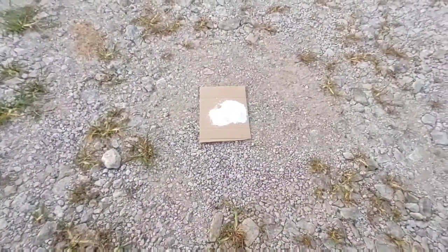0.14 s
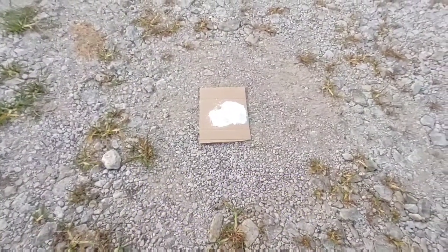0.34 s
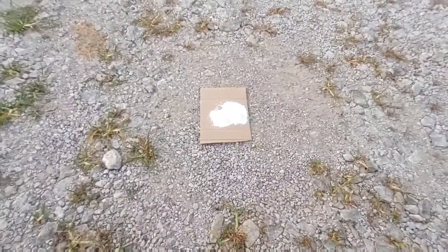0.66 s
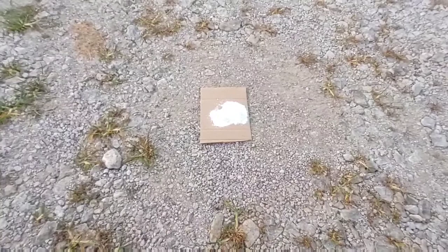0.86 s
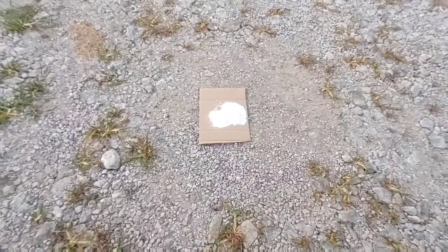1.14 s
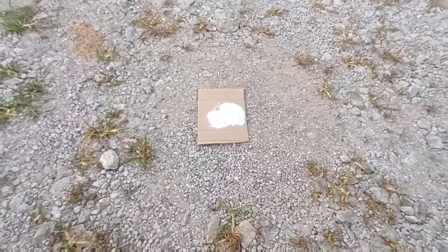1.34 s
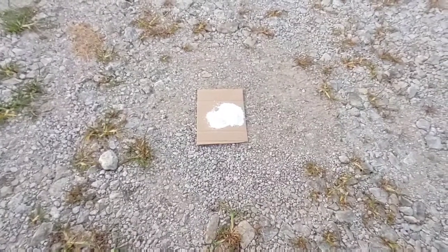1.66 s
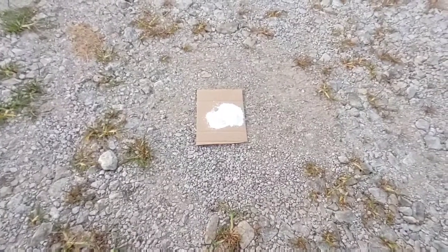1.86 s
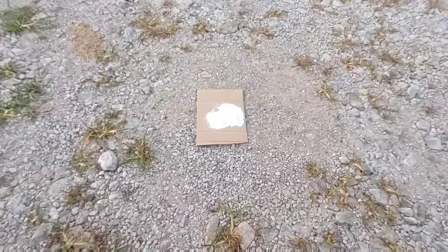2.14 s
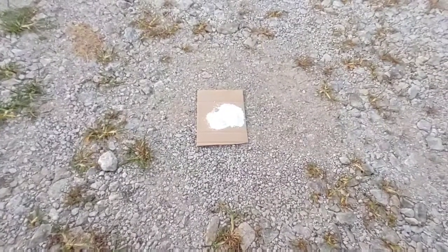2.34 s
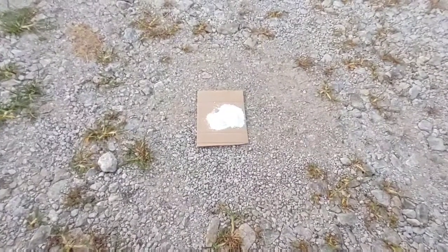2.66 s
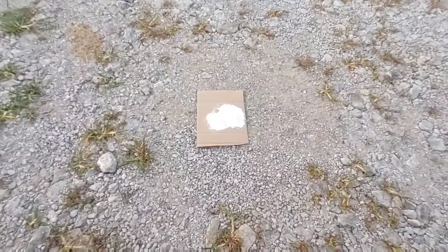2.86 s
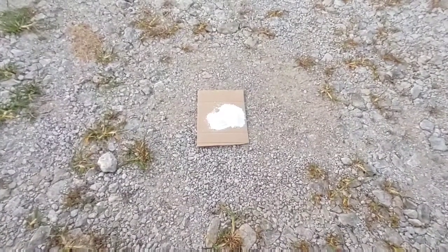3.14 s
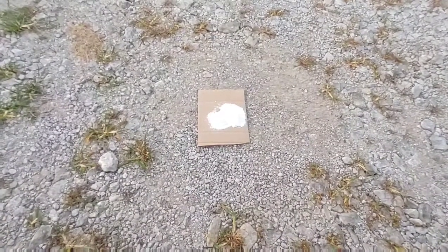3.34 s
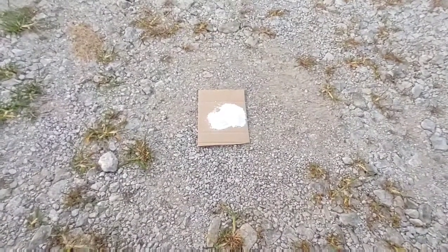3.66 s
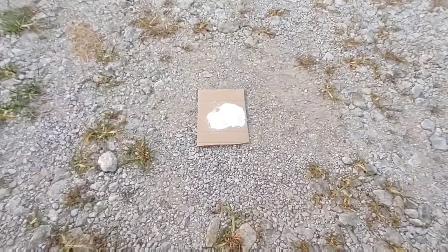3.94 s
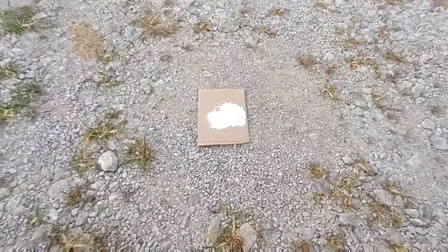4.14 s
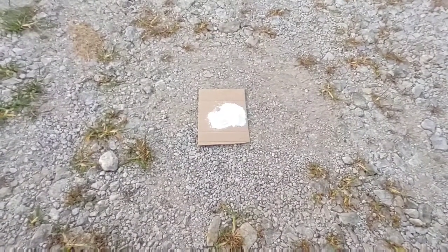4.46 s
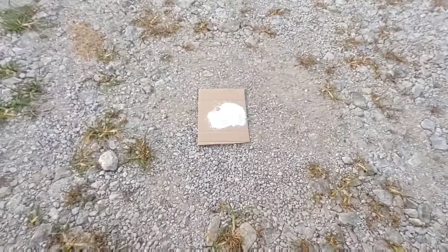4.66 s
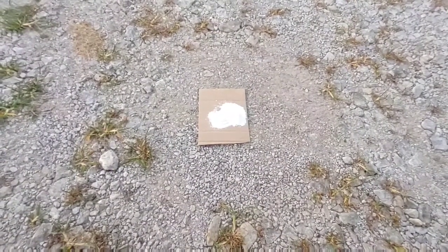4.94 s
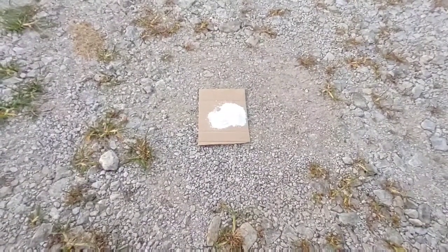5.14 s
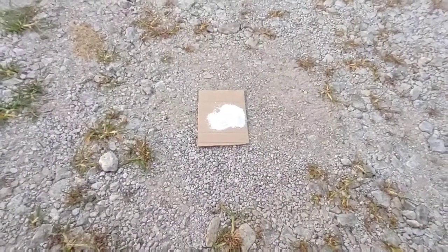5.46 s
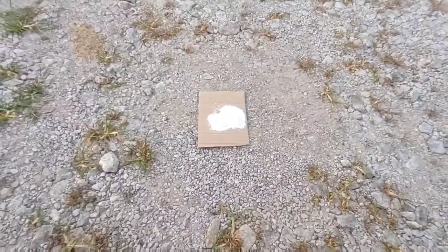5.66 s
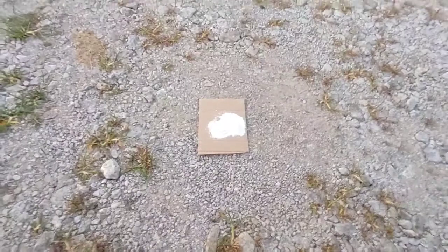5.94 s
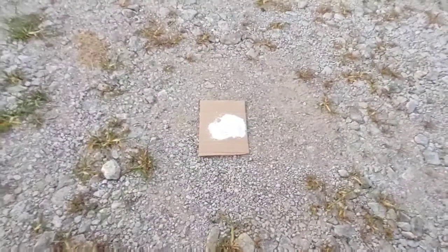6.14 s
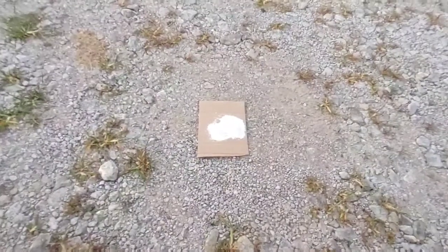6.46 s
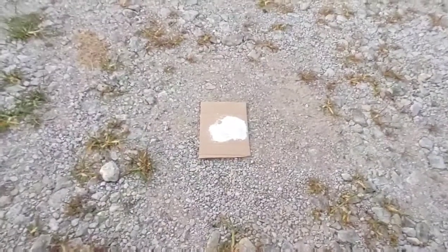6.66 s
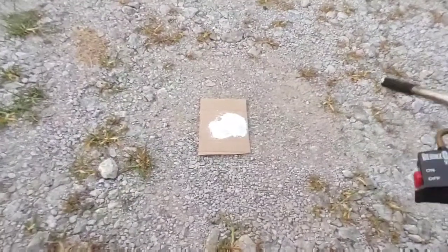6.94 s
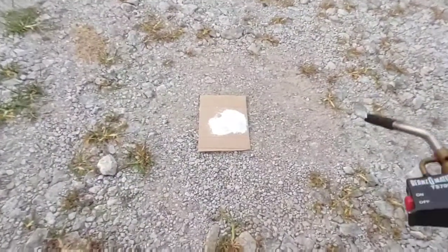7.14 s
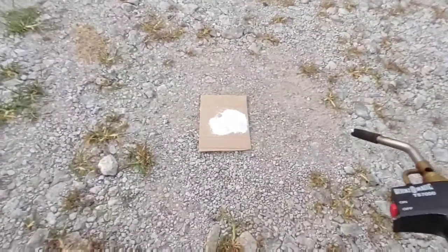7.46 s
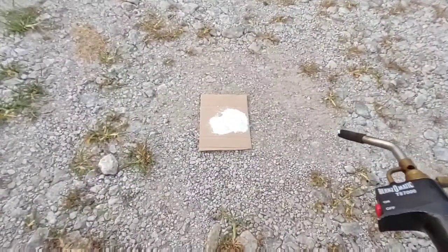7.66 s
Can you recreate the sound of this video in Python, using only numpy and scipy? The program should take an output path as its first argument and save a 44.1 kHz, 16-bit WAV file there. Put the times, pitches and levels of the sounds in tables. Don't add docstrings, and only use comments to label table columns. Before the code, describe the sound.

A handheld gas torch roars and hisses steadily outdoors, its hollow tone sweeping as it moves, with a quick swing away and back near the end.

```python
import sys
import numpy as np
from scipy import signal
from scipy.fft import rfft, irfft, next_fast_len
from scipy.io import wavfile
from scipy.ndimage import map_coordinates

SR = 44100
rng = np.random.default_rng(int(sys.argv[2]) if len(sys.argv) > 2 else 0)


def transcribe(u):
    v = np.clip(np.atleast_2d(u).T, -1, 1)
    q = np.round(v * 32767).astype(np.int16)
    wavfile.write(sys.argv[1], SR, q)


def gain_from_db(level_db):
    decades = np.asarray(level_db, float) / 20
    return 10 ** decades


N = 343539

# t/s, left bounce delay/ms, right bounce delay/ms, left port lag/ms, facing level/dB
TORCH_PATH = [(0, 1.38, 1.67, 0.36, -1), (.4, 1.13, 1.44, 0.26, 0.5), (.55, 0.93, 0.95, 0.18, -1),
              (.8, 0.52, 0.67, 0.16, 0.7), (1.15, 0.48, 0.4, 0.13, 0), (1.38, 0.4, 0.38, 0.116, -0.2),
              (2.1, 0.33, .38, 0.092, -0.5), (2.749, 0.32, 0.32, 0.085, -1), (3.05, 0.3, 0.33, 0.061, -0.5),
              (3.4, 0.15, 0.19, 0.053, -1.4), (5.0, 0.2, 0.2, 0.06, 0.1), (5.401, 0.14, 0.1, 0.022, 0),
              (6.18, 0.15, 0.12, 0.051, -0.3), (6.4, 1.07, 1.13, .12, -0.4),
              (6.718, 2.23, 2.36, 0.29, -2.8), (6.93, 1.2, 1.44, 0.2, -1), (7.17, 1.12, 1.28, 0.074, -0.4),
              (7.3, 0.39, 0.35, 0.063, 1), (7.44, 0.47, 0.46, 0.074, -1), (7.58, 0.13, 0.18, 0.067, -2.6)]
# f/Hz, level/dB per Hz
LEFT_JET_COLOUR = [(4400, -12), (5000, -3), (5400, -7.5), (6100, -8.5), (6800, -13), (7100, -17.5),
                   (7600, -21), (8300, -25), (9400, -24.5), (10700, -21), (11700, -20.5), (12700, -25),
                   (13300, -27)]
RIGHT_JET_COLOUR = [(4400, -13), (5000, -4), (5400, -1), (5800, -5), (6200, -5.5), (6550, -10),
                    (7050, -6.5), (7500, -10), (8000, -14.5), (8700, -10.5), (9200, -17), (9700, -23),
                    (11700, -23), (13300, -27)]
# f/Hz, level/dB per Hz
FLAME_COLOUR = [(25, -43), (50, -39), (100, -32), (140, -19.5), (200, -8), (300, -4.5), (500, -2),
                (750, -0.1), (1050, 0), (1500, -3.5), (2100, -8), (2900, -9.5), (3800, -11)]
# f/Hz, level/dB
FLAME_BALANCE = [(300, -2.5), (700, 1.5), (1200, 3), (1800, 7.5), (2500, -5), (3800, 0)]
# f/Hz, share/0-1
COHERENCE = [(25, .02), (60, .62), (110, .97), (200, .998), (600, .99), (1200, .98), (2200, .95),
             (4300, .9), (5200, .3), (7000, .1), (12000, .2)]
# f/Hz, steepness/1
LAYER_EDGES = [(300, 8), (4300, 8), (6500, 8), (8000, 24), (9400, 24), (12400, 48)]
# level/dB, share of facing/1, level per lag/dB per ms,
# left-right level/dB, left-right level per lag/dB per ms
LAYER_LEVELS = [(-37, 0.11, -6.5, -0.5, 4), (-26.5, 1, 2, 2, -11.5), (-37, 0.074, 9, 1, -18),
                (-42.5, 0.074, 4, 1.5, -42.5), (-48, 0.074, 22, 1.5, -41), (-47.5, .08, 11.5, 2, -23),
                (-47.5, .08, -10, 3.5, -85)]
# t/s, level/dB, half length/s
FLAME_FLARES = [
    (2.8, 1.6, 0.16),
    (7.22, 4.5, 0.024),
    (7.29, -4, 0.019),
    (7.34, 0.5, 0.032),
    (7.76, 3.5, 0.23),
]
# t/s, level/dB, half length/s
JET_SPITS = [
    (1.06, 1, 0.096),
    (5.32, 2, 0.076),
    (5.7, -1.5, 0.14),
    (6.07, 3, 0.041),
    (6.64, -6.5, 0.17),
    (7.24, 4.5, 0.13),
]
# t/s, level/dB
EDGE_TONE = [(0, 4.5), (.9, 6), (1.5, 3.5), (2.8, 1.5), (3.3, 0.5), (4.5, 0.5), (5.0, 4), (5.3, 2),
             (5.45, 1), (6.2, 1.5), (6.36, 3), (6.52, 6), (6.9, -2), (7.05, 5.5), (7.25, -1), (7.36, -1),
             (7.79, 3)]
# gain with torch low/0-1, gain per delay/ms^-1, loss per delay squared/ms^-2
GROUND_GAIN = [(0.578, 0.28, 0.11), (0.621, 0.56, 0.3)]
# f/Hz, width/Hz, share lost/0-1
CASING_SHADE = [(1360, 1000, 0.04), (1400, 1400, 0.42)]
# level/dB, level per bounce delay/dB per ms, low f/Hz, high f/Hz
GRAVEL_SCATTER = (-11, 5, 1108, 5183)
# low f/Hz, high f/Hz
BODY_BAND = [800, 3500]
# port/0-1, delay at ground/ms, delay per bounce delay/ms per ms, strength/0-1
ARM_REFLECTIONS = [(0, 0.72, 0.98, 0.1), (0, 2.15, 0.2, 0.1), (1, 1, 1, 0.2), (1, 1.3, 1.6, 0)]
# delay/ms, strength/0-1
CHEST_ECHO = [(2.92, 0.36), (2.95, 0.13)]
# low f/Hz, high f/Hz
CHEST_BAND = [483, 2030]
LEG_ECHO = (0.61, 0.1)
# t/s, left f/Hz, left f/Hz, left f/Hz, right f/Hz
HOLLOW_PATHS = [(.8, 966, 1295, 1860, 1010), (1.3, 1095, 1400, 1900, 1200), (2.2, 1140, 1480, 1907, 1340),
                (2.8, 1153, 1506, 1950, 1630), (3.25, 1134, 1570, 2240, 2150),
                (5.0, 1100, 1560, 2246, 2110), (6.2, 1104, 1577, 2200, 2062),
                (7.79, 1130, 1600, 2200, 2290)]
# port/0-1, width/Hz, share lost/0-1
HOLLOW_WIDTHS = [(0, 130, 0.5), (0, 130, .6), (0, 160, 0.5), (1, 283, .6)]

FLAME_LENGTH = 0.07
JET_BOUNCE = 0.016
GRAVEL_CUT_HZ, SCATTER_T60_S = 19845, 0.14
ARM_GONE_MS = 1


def in_time(rows):
    times, *columns = np.transpose(rows)
    return [np.interp(np.arange(N) / SR, times, column) for column in columns]


def at_hz(points, hz):
    table_hz, values = np.transpose(points)
    return np.interp(np.log(hz), np.log(table_hz), values)


def drift(rate_hz):
    pole = np.exp(-80 * np.pi * rate_hz / SR)
    noise = rng.standard_normal(N // 40 + 2002)
    slow = signal.lfilter([1], [1, -2 * pole, pole * pole], noise)[2000:]
    return np.interp(np.arange(N) / 40, np.arange(len(slow)), slow / slow.std())


def bumps(rows):
    t = np.arange(N) / SR
    return sum(db * np.exp(-((t - centre_s) / half_s) ** 2) for centre_s, db, half_s in rows)


def late(x, ms):
    return map_coordinates(x, [np.arange(N) - ms * SR / 1000], order=2, mode="mirror")


def band(x, edges_hz):
    return signal.sosfilt(signal.butter(1, edges_hz, "band", fs=SR, output="sos"), x)


def sides(shift_db):
    return gain_from_db(np.array([shift_db, -shift_db]) / 2)


def gravel_scatter(flame, bounce_ms):
    db, db_per_ms, *edges_hz = GRAVEL_SCATTER
    tail_s = np.arange(SR // 5) / SR
    tail = rng.standard_normal(SR // 5) * gain_from_db(-60 * tail_s / SCATTER_T60_S)
    tail = tail / np.linalg.norm(tail)
    return gain_from_db(db + db_per_ms * bounce_ms) * signal.fftconvolve(band(flame, edges_hz), tail)[:N]


def chest_echo(heard, port, lowered):
    ms, share = CHEST_ECHO[port]
    return share * (0.092 + 0.54 * lowered) * late(band(heard, CHEST_BAND), ms)


def leg_echo(flame, bounce_ms, lowered):
    delay_share, strength = LEG_ECHO
    return (1 - lowered) * strength * late(band(flame, CHEST_BAND), delay_share * bounce_ms)


def arm_echo(heard, port, bounce_ms, lowered):
    soft = band(heard, BODY_BAND)
    echoes = [share * late(soft, base_ms + slope * bounce_ms)
              for at, base_ms, slope, share in ARM_REFLECTIONS if at == port]
    return lowered * sum(echoes)


def moving_band(x, centre_hz, width_hz):
    out, state = np.zeros(N), np.zeros(2)
    pole = np.exp(-np.pi * width_hz / SR)
    b = (1 - pole * pole) / 2 * np.array([1, 0, -1])
    for i in range(0, N, 512):
        a = [1, -2 * pole * np.cos(2 * np.pi * centre_hz[i] / SR), pole * pole]
        out[i:i + 512], state = signal.lfilter(b, a, x[i:i + 512], zi=state)
    return out


def hollowed(x, port, lowered):
    for hz, (at, width_hz, share) in zip(in_time(HOLLOW_PATHS), HOLLOW_WIDTHS):
        if at == port:
            x = x - share * lowered * moving_band(x, hz, width_hz)
    return x


def casing_shade(x, centre_hz, width_hz, share):
    return x - share * signal.lfilter(*signal.iirpeak(centre_hz, centre_hz / width_hz, fs=SR), x)


def ground_bounce(flame, jet, port, ms):
    low_gain, rise, loss = GROUND_GAIN[port]
    gain = np.clip(low_gain + rise * ms - loss * ms ** 2, 0, 0.95)
    rough = signal.butter(1, GRAVEL_CUT_HZ, fs=SR, output="sos")
    downward = casing_shade(signal.sosfilt(rough, flame + JET_BOUNCE * jet), *CASING_SHADE[port])
    spread = FLAME_LENGTH * (0.6 + 0.6 * ms)
    return gain * sum(late(downward, ms * (1 + spread * part)) for part in (-1, 0, 1)) / 3


def position():
    rows = [(s, np.log(a), np.log(b), np.log(c), db) for s, a, b, c, db in TORCH_PATH]
    left, right, lag, facing_db = in_time(rows)
    return np.exp(left), np.exp(right), np.exp(lag), facing_db


def port_db(jet_colour, side, hz):
    low = [(f, db + side * at_hz(FLAME_BALANCE, f) * (f > 400) / 2) for f, db in FLAME_COLOUR]
    return at_hz(low + jet_colour, hz)


def turbulence():
    size = next_fast_len(N)
    hz = np.maximum(np.arange(size // 2 + 1) * SR / size, 1)
    shared, left, right = rfft(rng.standard_normal((3, size)))
    alike = np.clip(at_hz(COHERENCE, hz), 0, 1)
    ports = np.sqrt(alike) * shared + np.sqrt(1 - alike) * np.array([left, right])
    ports = ports * gain_from_db([port_db(LEFT_JET_COLOUR, 1, hz), port_db(RIGHT_JET_COLOUR, -1, hz)])
    slopes = [1 / (1 + (hz / edge) ** steep) for edge, steep in LAYER_EDGES]
    below = [0 * hz] + slopes + [1 + 0 * hz]
    layers = [irfft(ports * (upper - lower), size)[:, :N] for lower, upper in zip(below, below[1:])]
    return [layer / layer.std() for layer in layers]


def torch(lag_ms, facing_db):
    layers = []
    for layer, (db, share, db_per_ms, shift_db, shift_per_ms) in zip(turbulence(), LAYER_LEVELS):
        level = gain_from_db(db + share * facing_db + db_per_ms * lag_ms)
        layers.append(layer * level * sides(shift_db + shift_per_ms * lag_ms))
    rumble, roar, hiss, sizzle, whistle, air, top = layers
    flow, lick = drift(31), drift(21)
    flare_db, spit_db = bumps(FLAME_FLARES), bumps(JET_SPITS)
    rumble = rumble * gain_from_db(flare_db + 0.075 * lick + 1.5 * drift(4.7))
    roar = roar * gain_from_db(flare_db + 0.5 * lick + 0.4 * flow + 0.7 * drift(2.45))
    hiss = hiss * gain_from_db(spit_db + 0.21 * flow + 0.7 * drift(19)) * sides(1.5 * drift(4.6))
    edge_db, = in_time(EDGE_TONE)
    air = air * gain_from_db([edge_db, 0.15 * edge_db]) + top
    flutter = gain_from_db(0.45 * spit_db + 0.24 * flow + 0.7 * drift(15.0))
    sizzle = (sizzle + whistle + air) * flutter * sides(1.8 * drift(2.3))
    return rumble + roar, hiss + sizzle


def scene():
    *bounce_ms, lag_ms, facing_db = position()
    out = []
    for port, (flame, jet) in enumerate(zip(*torch(lag_ms, facing_db))):
        ms = bounce_ms[port]
        lowered = np.exp(-(ms / ARM_GONE_MS) ** 2)
        heard = flame + jet + ground_bounce(flame, jet, port, ms)
        total = heard + gravel_scatter(flame, ms) + chest_echo(heard, port, lowered)
        total = total + leg_echo(flame, ms, lowered) + arm_echo(heard, port, ms, lowered)
        out.append(hollowed(total, port, lowered))
    return np.array([late(out[0], lag_ms), out[1]])


def top_cut(x):
    return signal.sosfilt(signal.butter(12, 13170, fs=SR, output="sos"), x)


def record(dry):
    return top_cut(dry)


dry = scene()
out = record(dry)
transcribe(out)
```